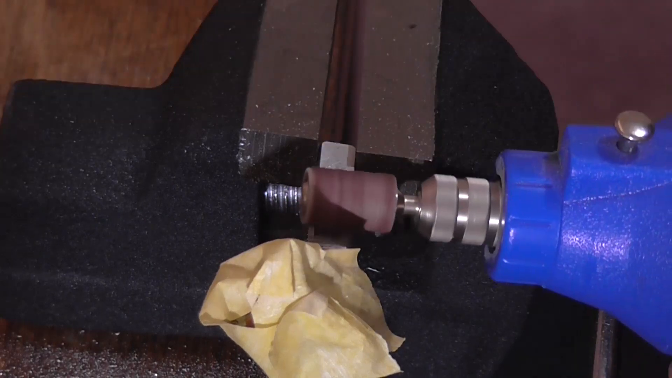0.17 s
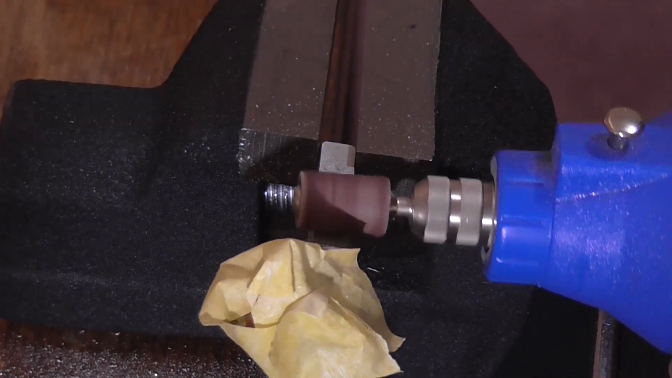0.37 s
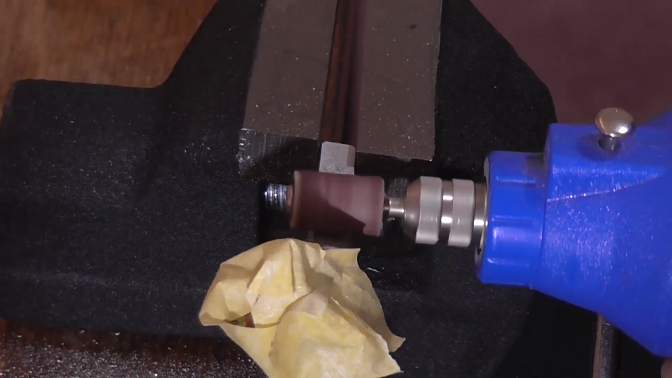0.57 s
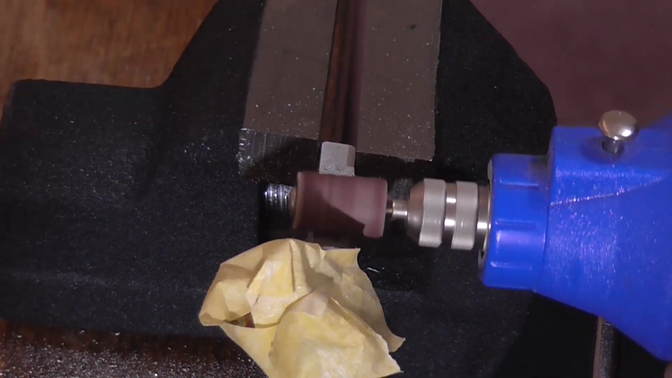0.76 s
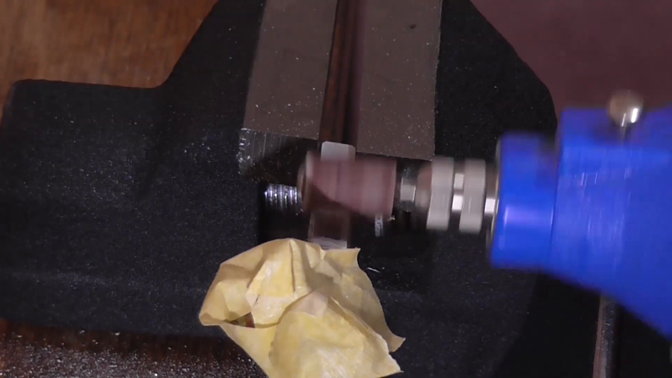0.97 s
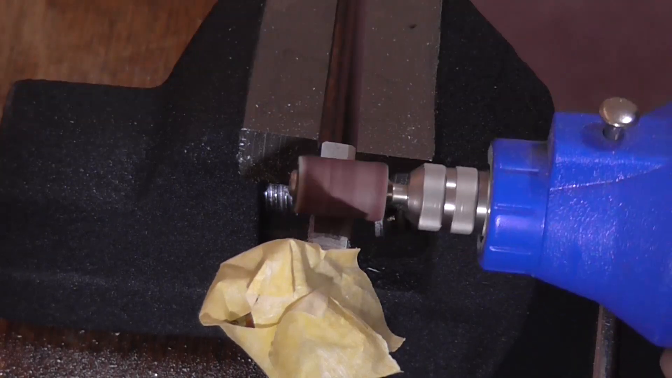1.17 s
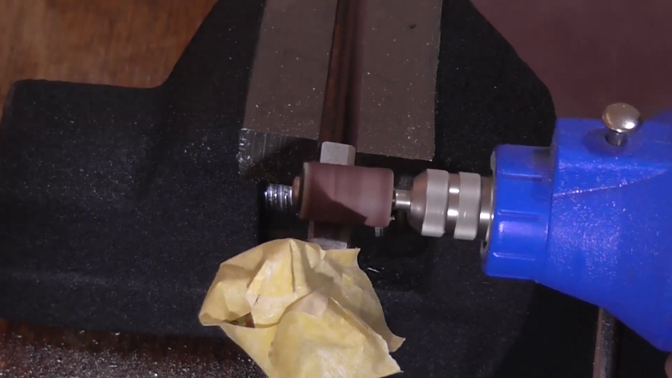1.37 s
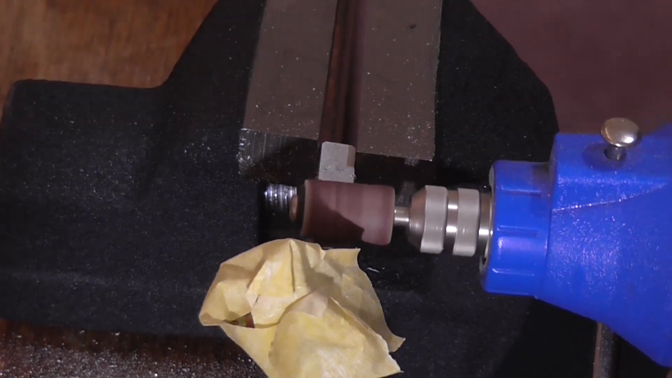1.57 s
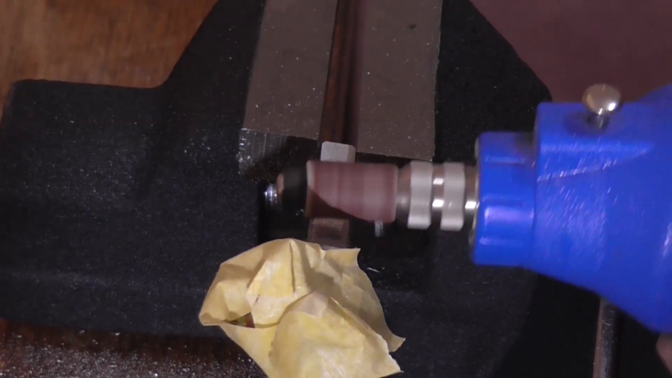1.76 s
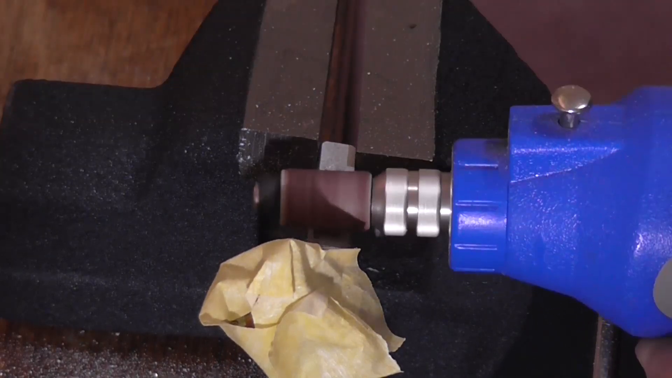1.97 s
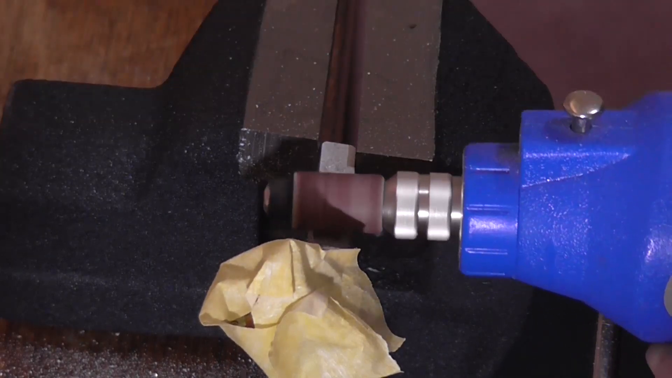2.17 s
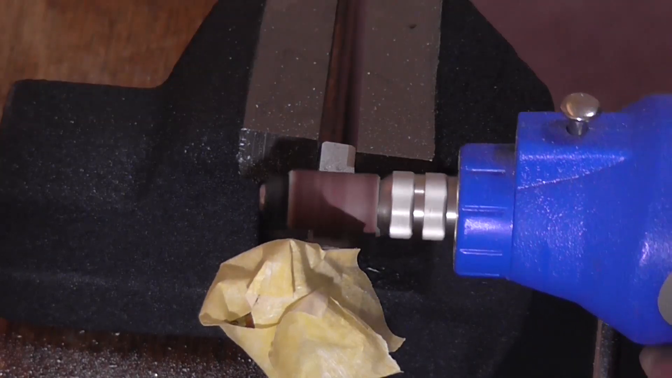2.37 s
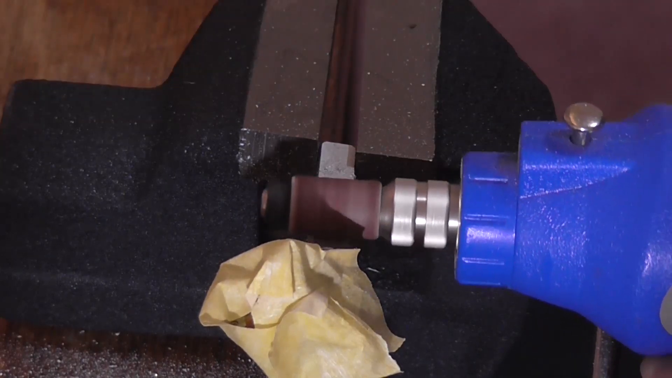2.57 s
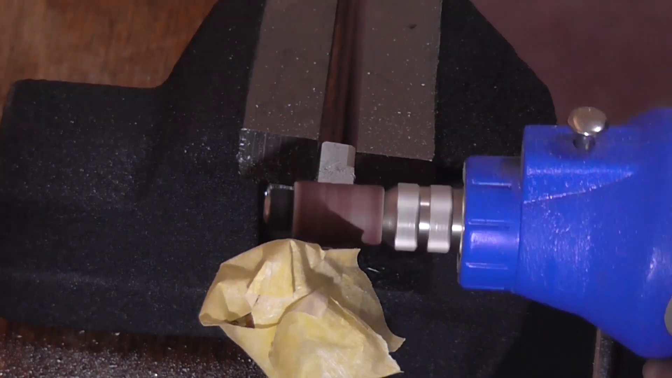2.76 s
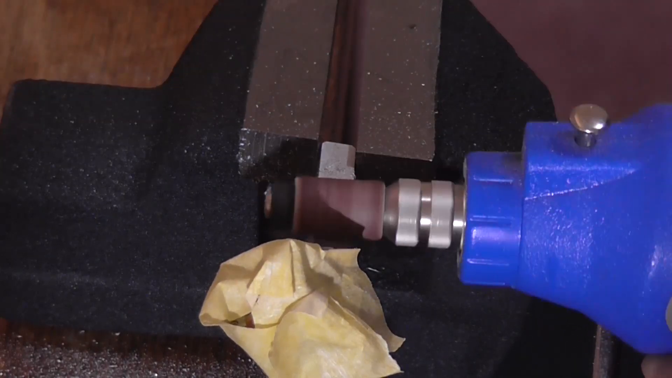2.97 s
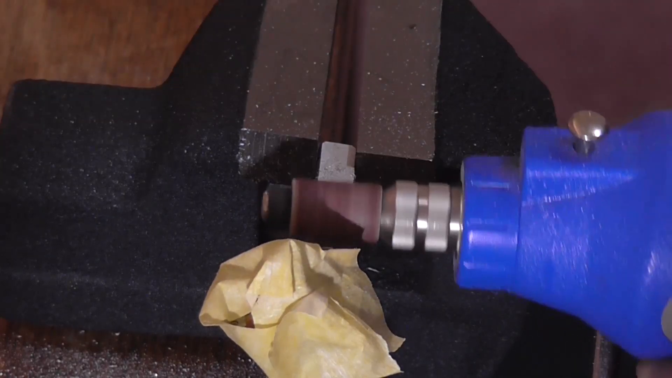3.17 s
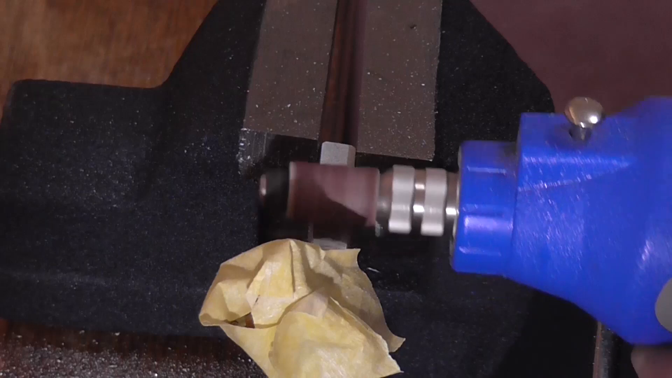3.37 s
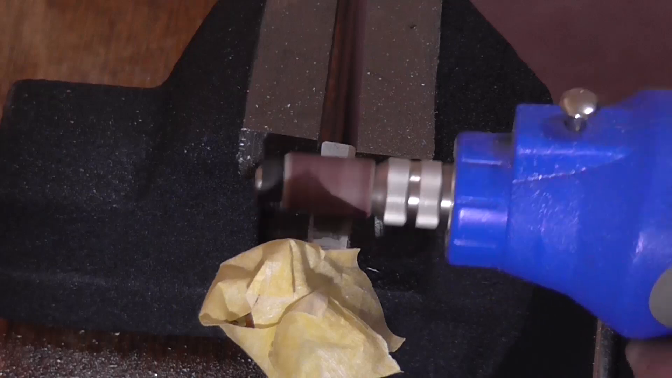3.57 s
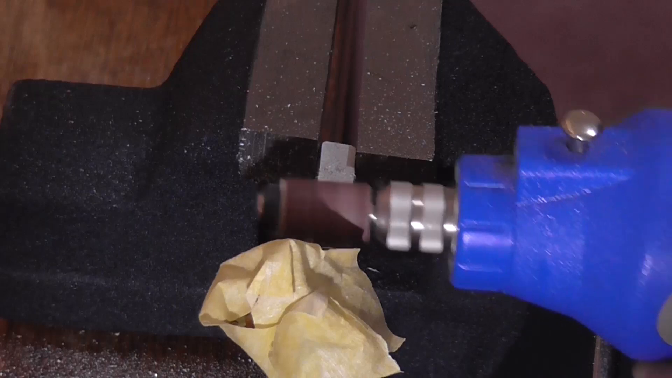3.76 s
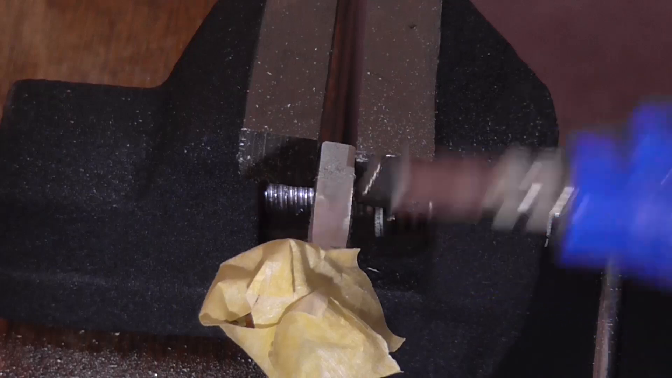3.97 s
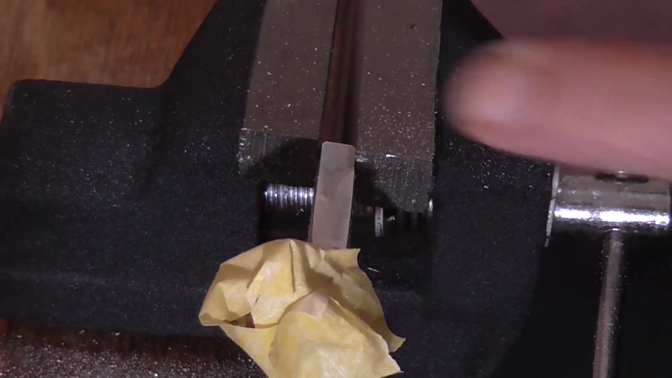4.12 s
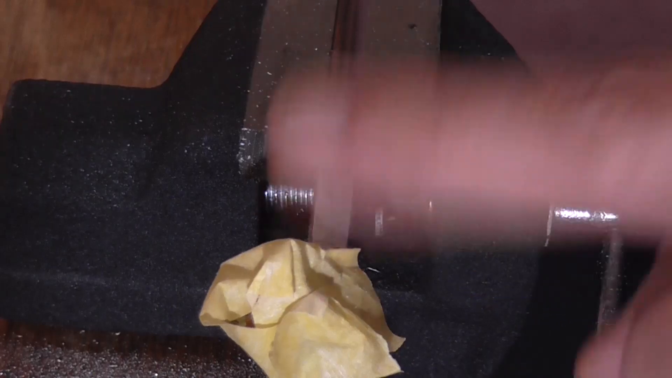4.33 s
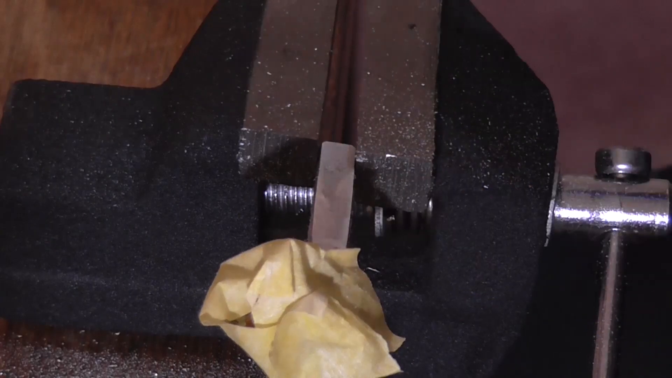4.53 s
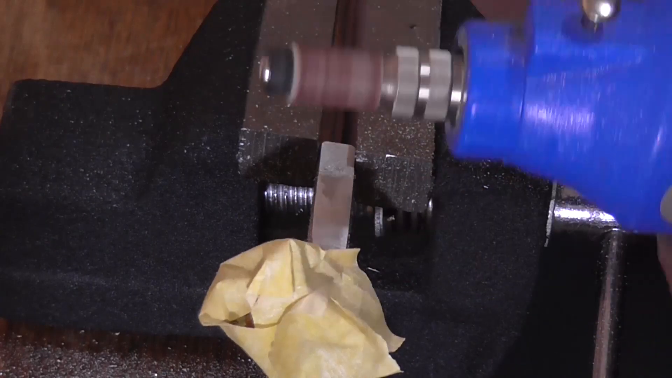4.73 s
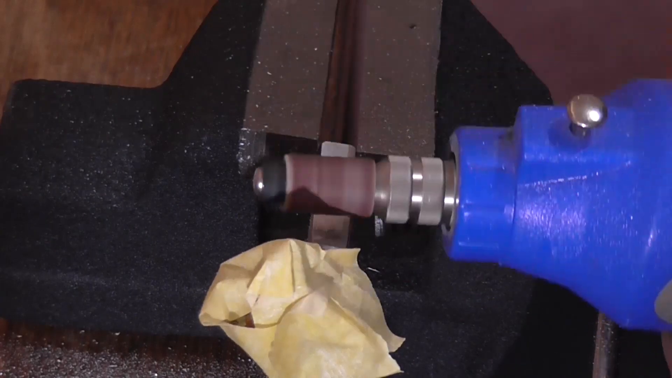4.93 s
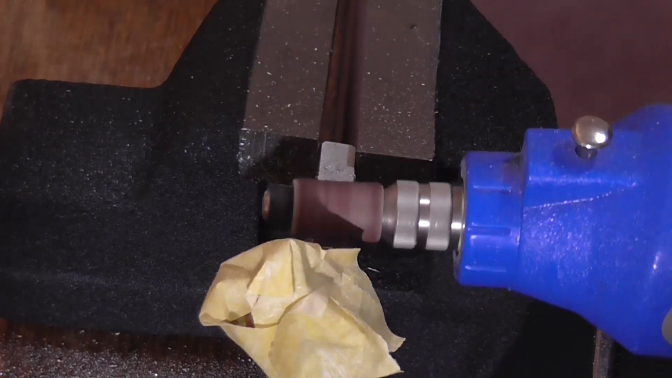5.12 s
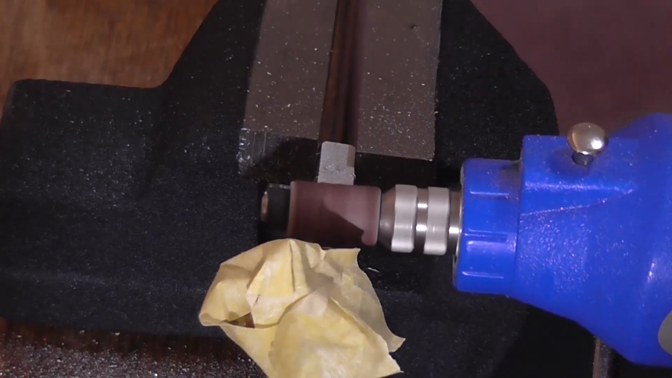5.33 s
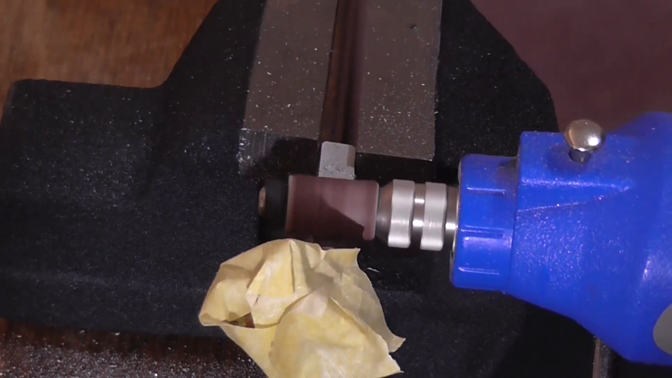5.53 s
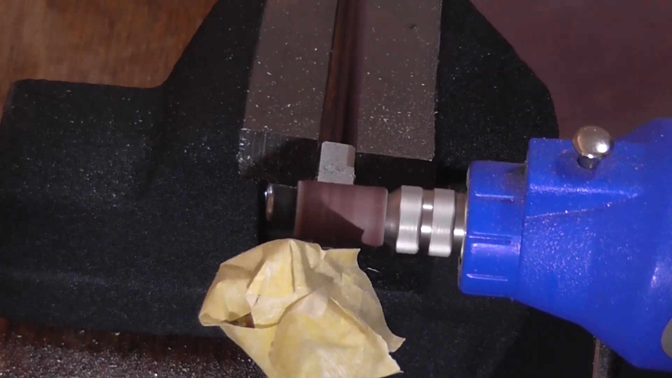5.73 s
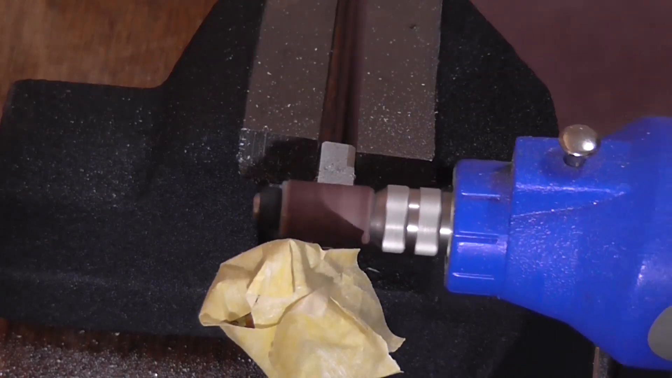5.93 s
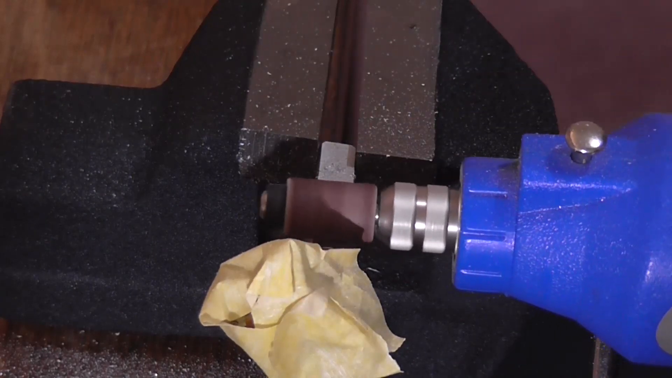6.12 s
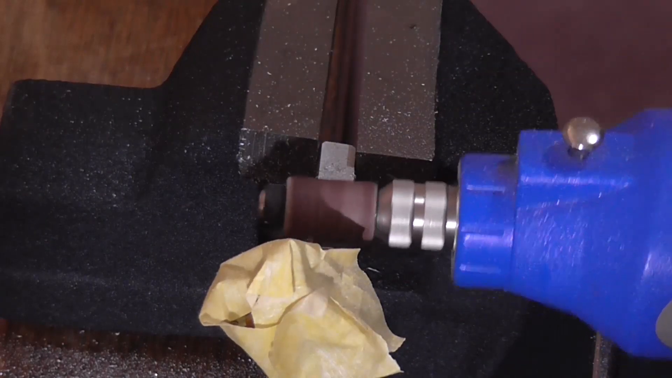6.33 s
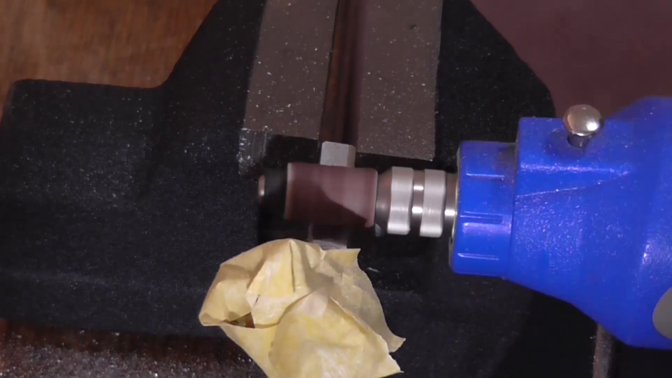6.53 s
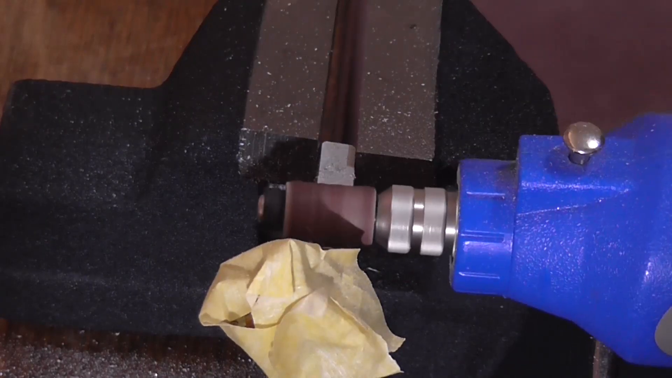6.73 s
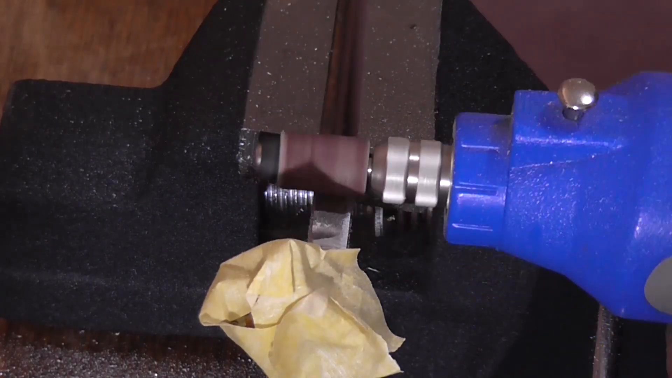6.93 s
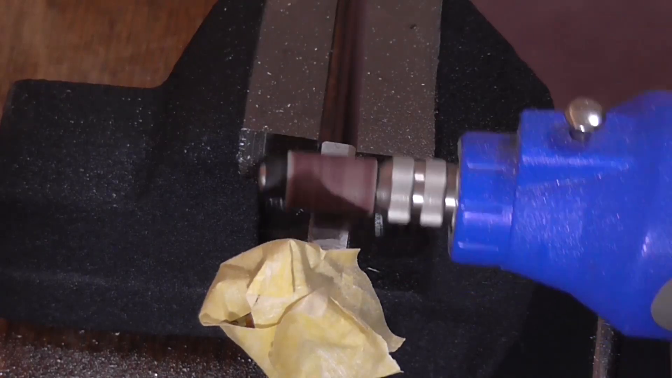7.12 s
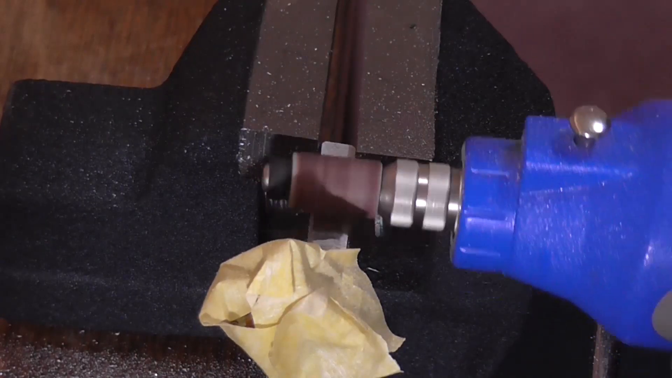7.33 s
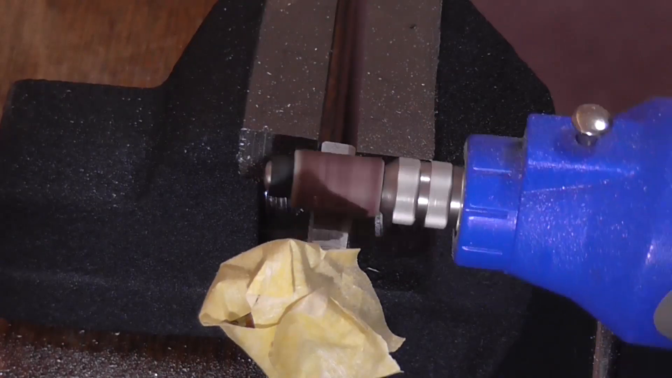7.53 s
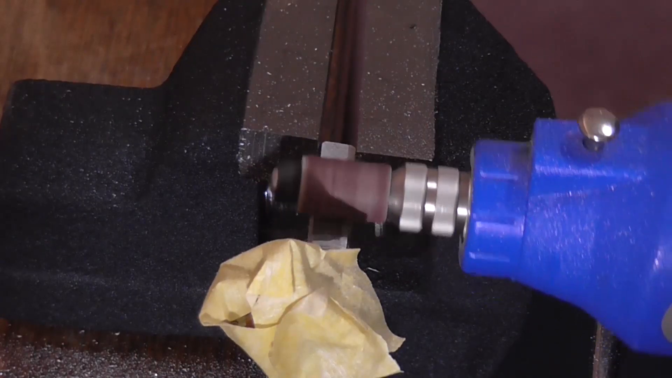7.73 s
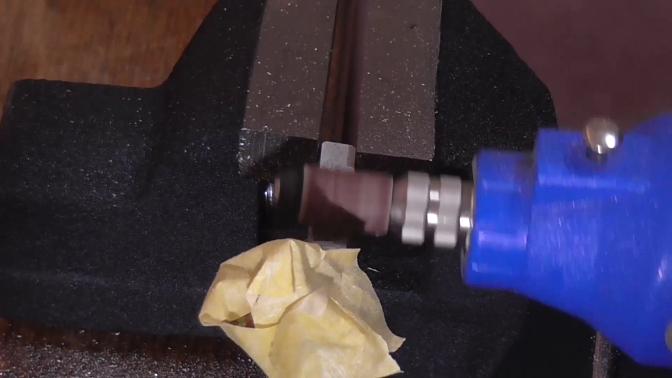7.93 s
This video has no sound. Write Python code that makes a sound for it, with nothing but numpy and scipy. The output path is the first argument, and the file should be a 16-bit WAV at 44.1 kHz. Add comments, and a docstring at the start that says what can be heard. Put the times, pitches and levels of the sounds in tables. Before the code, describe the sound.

A handheld rotary tool whines at a high pitch throughout, heard close up in a quiet room. Almost at once its sanding drum bites into a small steel shaft held in a vise, making a buzzing rasp and a bright gritty hiss over a faint hum from the vise. The motor's pitch sags and wavers with the hand's pressure. The grinding breaks off briefly at about 1.1 and 1.9 seconds, and a sharp little click comes near 3 seconds. From 4 to 5.3 seconds the tool runs free with a higher, steadier whine, short bursts of bearing chatter and a soft double bump on the bench around 4.5 seconds. Grinding resumes with a harsh scrape at 5.3 seconds, lifts for a moment at 6.5, then continues until 8 seconds with a few tiny ringing squeals and another click.

```python
"""A handheld rotary tool grinds the end of a small steel shaft held in a vise.
Running free, its motor and fan whine on the multiples of its speed. In six passes the sanding drum
is pressed on: the motor slows, and once a turn the drum's high side drags its grit over the steel.
The shaft rasps, the grains hiss, the vise thrums and its jaws growl. In the longest pause the tool
swings aside, its bearings chatter and the bench takes two soft bumps, all in a quiet room."""
import sys
import numpy as np
from scipy import signal
from scipy.fft import rfft, irfft, next_fast_len
from scipy.io import wavfile
from scipy.ndimage import uniform_filter1d, map_coordinates

SR = 44100
rng = np.random.default_rng(int(sys.argv[2]) if len(sys.argv) > 2 else 0)


def unload_audio(sound):
    """Save the sound as a 16-bit wav file, at the path given as the first command line argument."""
    columns = np.transpose(np.atleast_2d(sound))
    # keep every value between -1 and 1, then stretch to whole-number steps
    steps = np.round(np.clip(columns, -1, 1) * 32767)
    wavfile.write(sys.argv[1], SR, steps.astype(np.int16))


N = 352359

# Resonances of vise and bench. Each row: frequency in Hz, width in Hz, relative level in dB.
VISE_MODES = [(421.2, 10.1, 8.5), (500.5, 6, 11)]
# Resonances of shaft, drum and housing. Each row: frequency in Hz, width in Hz, relative level in dB.
SHAFT_MODES = [(1357, 220, -8.5), (1500, 22, 1.5), (1692, 140, -3), (1956, 56, -3), (2128, 93, 1),
               (2307, 53, 6), (2514, 233, -3), (2676, 39, 6.5), (2845, 100, 1.5), (3139, 52, 4.5),
               (3486, 390, -2.5), (4055, 380, 4), (4193, 230, 6), (4543, 85, 2), (4880, 1500, -11.5)]
# Dust thrown off the drum. Each row: frequency in Hz, relative level in dB.
DUST_SPECTRUM = [(1500, -36), (4800, 4), (12000, 0), (16000, -18)]
# Grains cutting the steel. Each row: frequency in Hz, relative level in dB.
HISS_SPECTRUM = [(400, -106), (3500, -2.5), (5600, -17.5), (6300, -4), (7680, 0.5), (8150, -3), (8500, 4),
                 (9000, -7), (9700, 0.5), (10200, -7), (13200, -4.5), (14100, -11), (16000, -11)]
# The spindle chatters in its bearings. Each row: centre in seconds, width in seconds, level in dB.
CHATTER_BURSTS = [(4.113, 0.04, -41), (4.371, 0.0086, -39), (4.749, 0.07, -49)]
# The drum lands on the shaft. Each row: time in seconds, knock level in dB, scrape level in dB.
DRUM_LANDINGS = [(0.153, -40, -30), (1.279, -41, -28.5), (2.002, -48, -39), (5.277, -42, -27.5),
                 (6.612, -41.5, -39)]


def amp(db):
    """Decibels as a gain."""
    return 10 ** (np.asarray(db) / 20)


def unit(x):
    """x at rms 1."""
    return x / np.sqrt(np.mean(x ** 2) + 1e-20)


def steady(x):
    """x with its slow swells taken out, at rms 1."""
    return x / np.sqrt(np.abs(uniform_filter1d(x * x, size=3000)) + 1e-9)


def clock():
    """The time of each sample in seconds."""
    return np.arange(N) / SR


def curves(rows):
    """One value per sample for each column after the time."""
    times, *columns = np.transpose(rows)
    return [np.interp(clock(), times, column) for column in columns]


def wobble(rate):
    """A smooth random curve, rate knots a second."""
    coarse = np.arange(0, N + 32, 32)
    knots = rng.standard_normal(int(N * rate / SR) + 4)
    return np.interp(np.arange(N), coarse, map_coordinates(knots, [coarse * rate / SR], mode="nearest"))


def swell(centre, width, db=0):
    """A bell-shaped gain; centre and width in seconds."""
    return amp(db) * np.exp(-.5 * ((clock() - centre) / width) ** 2)


def dying(blows, t60):
    """Envelope of (seconds, dB) blows that start softly and fade."""
    t = clock()
    return sum(amp(db - 60 * np.abs(t - s) / t60) * np.clip((t - s) / 0.0056 + .5, 0, 1)
               for s, db in blows)


def ringing_on(gain, decay_s=0.02):
    """A gain that rises at once and falls no faster than the steel rings out."""
    keep = np.exp(-1 / (decay_s * SR))
    return np.maximum(gain, signal.lfilter([1 - keep], [1, -keep], gain))


def filtered(x, response):
    """x through a complex response of frequency."""
    size = next_fast_len(N + SR // 4)
    return irfft(rfft(x, size) * response(np.fft.rfftfreq(size, 1 / SR)), size)[..., :N]


def coloured(x, points):
    """x shaped by (Hz, dB) points, at rms 1."""
    hz, db = np.transpose(points)
    return unit(filtered(x, lambda f: amp(np.interp(np.log(f + 1), np.log(hz), db))))


def rung(x, modes):
    """x through (Hz, width, dB) resonances, falling steeply outside their range, at rms 1."""
    low, high = .8 * modes[0][0], 1.25 * modes[-1][0]

    def response(f):
        peaks = sum((-1) ** k * amp(db) * 1j * f * width / (hz * hz - f * f + 1j * f * width)
                    for k, (hz, width, db) in enumerate(modes))
        return peaks * f ** 6 / (f ** 6 + low ** 6) / (1 + (f / high) ** 6)
    return unit(filtered(x, response))


def diffused(x, t60):
    """x smeared by a short, dense tail of decaying noise."""
    t = np.arange(SR // 8) / SR
    tail = rng.standard_normal(len(t)) * amp(-60 * t / t60)
    return signal.fftconvolve(x, tail / np.linalg.norm(tail))[:N]


def spread(x, side_db, t60):
    """Reflections off the bench differ left and right and widen the sound."""
    side = amp(side_db) * filtered(diffused(x, t60), lambda f: 1 / np.sqrt(1 + (f / 8000) ** 4))
    return np.array([x + side, x - side])


def off_axis(x, pan_db, lag_s):
    """The sound arrives louder on the right, but later than on the left."""
    sides = np.array([[-.5], [.5]])
    return filtered(x, lambda f: amp(pan_db * sides) * np.exp(-2j * np.pi * f * lag_s * sides))


def background(load):
    """Quiet room air and a rumble of the bench that grows with the load."""
    # Room tone and bench rumble. Each row: frequency in Hz, relative level in dB.
    room_spectrum = [(25, -18), (70, -14), (110, 1.5), (150, -7), (200, -1), (500, 6.5), (2000, -26)]
    bench_spectrum = [(30, -27), (110, -10), (150, -22), (195, 8.5), (260, -3.5), (330, 13.5), (600, -36)]
    noise = lambda: rng.standard_normal((2, N)) + rng.standard_normal(N)  # partly shared by both sides
    room = amp(-69.5) * coloured(noise(), room_spectrum)
    return room + amp(-50.5) * load * coloured(noise(), bench_spectrum)


def knocks(knock_t60, bump_ring_db):
    """The vise rings when the drum lands on the shaft; bumps on the bench thud and barely stir it."""
    # Soft bumps on the bench. Each row: time in seconds, level in dB.
    bumps = [(4.447, -47), (4.469, -50)]
    t, ring_hz = clock(), VISE_MODES[1][0]
    ring = sum(dying([(s, db)], knock_t60) * np.sqrt(2) * np.sin(2 * np.pi * ring_hz * (t - s))
               for s, db, _ in DRUM_LANDINGS)
    thud = coloured(rng.standard_normal(N), [(110, -27), (450, -2), (900, -15), (2500, -45)])
    stirred = amp(bump_ring_db) * steady(rung(rng.standard_normal(N), VISE_MODES))
    return ring + dying(bumps, t60=0.12) * thud + dying(bumps, t60=0.45) * stirred


def tremor(rate_hz, depth):
    """The hand's uneven trembling, as a factor on its force."""
    phase = rate_hz * clock() + .3 * wobble(7) + rng.random()
    return 1 + depth * np.sin(2 * np.pi * phase)


def hand():
    """The hand's drag on the spindle in Hz, and the gains of rasp, hiss, thrum and growl it drives."""
    # The drum is held to the steel. Each row: start and end in seconds, then base levels in dB
    # of rasp, hiss, thrum at the start, thrum at the end and growl.
    passes = [(0.154, 1.05, -28.5, -27.5, -37, -38.5, -39.5), (1.276, 1.824, -29.5, -30, -38.5, -42, -40),
              (2.005, 2.988, -28.5, -29, -42, -40, -38.5), (3.004, 4.038, -29, -30, -39.5, -44.5, -40.5),
              (5.277, 6.434, -30.5, -31, -40.5, -53, -42.5), (6.613, 7.996, -29.5, -28.5, -53, -41.5, -44)]
    # How hard the hand leans, one curve a pass. Each point: time in seconds, speed lost in Hz.
    leans = [
        [(0.155, 3.7), (0.245, 7.8), (0.27, 24), (0.31, 9), (0.445, 11), (0.475, 22.5), (0.685, 20.3),
         (0.79, 35.2), (0.88, 38), (0.95, 31.5), (0.995, 40), (1.01, 16), (1.055, 27.3)],
        [(1.28, 12), (1.39, 3.76), (1.455, 34.4), (1.61, 19.2), (1.665, 29.6), (1.74, 48.6), (1.77, 32.4),
         (1.825, 40)],
        [(2.005, 11.7), (2.14, 41.3), (2.19, 27), (2.22, 44), (2.32, 31.5), (2.395, 35.3), (2.41, 65.5),
         (2.495, 40.5), (2.615, 54), (2.695, 63), (2.735, 34), (2.93, 49.3), (2.98, 10.9)],
        [(3.005, 14.8), (3.09, 52.6), (3.145, 56), (3.175, 21.6), (3.255, 64), (3.37, 33.0), (3.4, 58.7),
         (3.54, 34), (3.575, 68), (3.6, 47), (3.69, 45), (3.83, 57), (3.88, 34.5), (3.915, 82.5), (3.995, 54),
         (4.015, 25)],
        [(5.28, 8.5), (5.42, 15.2), (5.46, 38.7), (5.62, 53), (5.67, 46.3), (5.74, 70), (5.765, 48.4),
         (5.855, 62.4), (5.89, 58.5), (6.02, 63.4), (6.44, 52.5)],
        [(6.615, 19.8), (6.735, 21.2), (6.87, 51), (7.09, 33.4), (7.165, 79), (7.19, 50.6), (7.255, 38.3),
         (7.36, 69), (7.46, 47), (7.52, 58), (7.535, 70), (7.655, 44), (7.72, 73), (7.825, 45), (7.86, 80),
         (7.965, 43)],
    ]
    # The grit catches (+) or skates (-). Each row: centre and width in seconds, rasp and hiss in dB.
    catches = [(0.27, 0.016, 4.5, 1.5), (0.354, 0.048, -4.5, -3), (0.707, 0.038, 2, 3),
               (0.947, 0.018, 1, 1.5), (1.627, 0.013, 4.5, 3.5), (2.988, 0.021, -5, 0),
               (3.178, 0.016, -5, -3.5), (3.238, 0.016, 2, -1), (4.026, 0.016, -3.5, 0),
               (5.307, 0.0092, -8, -7), (6.779, 0.03, -4.5, -5), (6.889, 0.018, -8, -10),
               (7.151, 0.029, -1.5, -2)]
    inertia_s, clog_db_per_s, usual_drag_hz = 0.0088, -4, 40
    bite_s, lift_s = 0.00933, .022
    t, drag, gains = clock(), np.zeros(N), np.zeros((4, N))
    trembling = tremor(rate_hz=11.5, depth=.13)
    catch_rasp = sum(db * swell(s, width) for s, width, db, _ in catches)
    catch_hiss = sum(db * swell(s, width) for s, width, _, db in catches)
    for (start, end, rasp_db, hiss_db, *thrum_db, growl_db), lean in zip(passes, leans):
        contact = np.interp(t, [start - bite_s, start, end, end + lift_s], [0, 1, 1, 0])
        on = contact > 0
        s = t[on]
        ahead = s + inertia_s  # the force leads the drop in speed
        force = np.interp(ahead, *np.transpose(lean)) * np.interp(ahead, t, trembling)
        shove_db = -0.0359 * (force - uniform_filter1d(force, size=12000))  # softens sudden shoves
        # More force, louder grinding: the slopes are in dB per Hz of drag.
        rasp = rasp_db + 0.0654 * force + shove_db + catch_rasp[on]
        hiss = hiss_db + 0.133 * force + clog_db_per_s * (s - start) + catch_hiss[on]
        thrum = np.interp(s, [start, end], thrum_db) + 0.1023 * (force - usual_drag_hz)
        growl = growl_db + 0.1392 * (force - usual_drag_hz) + shove_db
        drag[on] += contact[on] * np.interp(s, *np.transpose(lean)) * trembling[on]
        gains[:, on] += contact[on] * amp([rasp, hiss, thrum, growl])
    return drag, gains


def rotation(speed, load, flutter, judder):
    """Turns made by the spindle, whose speed trembles, more so under load."""
    return np.cumsum(speed * (1 + flutter * wobble(130) + judder * load * wobble(120))) / SR


def high_side(turns, sharp, base):
    """Contact force: a peak once a turn over a steady share."""
    return base + np.exp(sharp * (np.cos(2 * np.pi * turns) - 1))


def grit(turns, wear_rate, loose, grains=96):
    """The same grains come round each turn and slowly change; loose chips add fresh noise."""
    surface = rng.standard_normal((int(N / SR * wear_rate) + 3, grains))
    track = map_coordinates(surface, [clock() * wear_rate, turns % 1 * grains], order=2, mode="grid-wrap")
    return unit(track) + loose * rng.standard_normal(N)


def shaking(turns, load, thrum_gain, growl_gain):
    """The drum's push makes the vise thrum at the speed and its jaws growl an octave above."""
    # Resonances of the jaws. Each row: frequency in Hz, width in Hz, relative level in dB.
    jaw_modes = [(671.3, 11.3, 19), (798, 29, 12.5), (838.5, 44, 18.5)]
    skips = load * (2 * wobble(90) + 3 * wobble(700))  # under load the drum hops and pushes unevenly
    push = high_side(turns, sharp=0.4, base=0) * (1 + 0.39 * wobble(60) + skips)
    waver = amp(0.72 * wobble(30))
    jolts = (0.19 + 1.5 * load) * rng.standard_normal(N)
    thrum = waver * steady(rung(push + jolts, VISE_MODES))
    flicker = amp(3.16 * wobble(45) + 3.55 * wobble(160))
    octave = flicker * np.tanh(load / 0.017) * np.sqrt(2) * np.sin(2 * np.pi * 2 * turns)
    rattle = (.08 + 4 * load) * rung(rng.standard_normal(N), jaw_modes)
    growl = amp(1.6 * wobble(22)) * unit(octave + rattle)
    return ringing_on(thrum_gain) * thrum + ringing_on(growl_gain) * growl


def draught(turns):
    """Cooling air chopped by the fan."""
    # The fan's draught. Each row: frequency in Hz, relative level in dB.
    air_spectrum = [(100, -52), (700, 2.5), (4200, 2), (5100, -11), (6000, 0.5), (6800, 1.5), (12000, 5.5),
                    (16000, -26)]
    chopped = amp(2 * wobble(14)) * grit(turns, wear_rate=30, loose=0.62)
    return amp(-47.5) * coloured(chopped, air_spectrum)


def bearing_chatter(turns):
    """The spindle rattles in its bearings in short bursts that ring the housing."""
    bursts = sum(swell(*row) for row in CHATTER_BURSTS)
    rattle = grit(turns, wear_rate=67, loose=0.8)
    return bursts * (amp(3.0) * rung(rattle, SHAFT_MODES) + amp(-14.0) * coloured(rattle, DUST_SPECTRUM))


def motor(turns, load):
    """Fan and commutator partials, each wavering on its own; load damps the high ones most."""
    # The strongest partials beam in different directions.
    # Each row: multiple of the speed, level in dB facing the vise, level in dB swung aside.
    loud_partials = [(4, -47, -51.5), (6, -45, -48), (7, -49.5, -39), (15, -46.5, -48.5), (25, -40, -48.5),
                     (26, -42, -58), (30, -43, -57)]
    # Weaker motor and fan partials. Each row: multiple of the speed, relative level in dB.
    weak_partials = [(1, -26.5), (2, -16.5), (3, -19.5), (8, -13), (10, -17.5), (11, -22.5), (12, -22),
                     (14, -17.5), (16, -18), (17, -13.5), (20, -16), (22, -17), (23, -14), (28, -15),
                     (29, -10.5), (33, -23), (34, -14.5)]
    # How the tool is held. Each row: time in seconds, swing aside from 0 to 1, gain in dB of the
    # loud and weak partials, level in dB of the lower whine, level in dB of the upper whine.
    poses = [(0.06, 0.08, 1, -40.5, -46.5), (1.2, 0, 0, -43.5, -42), (1.92, 0.04, -0.5, -46, -42.5),
             (4.05, 0.04, -2, -39, -41), (4.17, 0.95, 0.5, -46.5, -52), (4.58, 0.98, 0, -45, -47),
             (4.7, 0.21, 0, -38.5, -39.5), (4.83, 0, 0, -39, -34.5), (4.9, 0.25, -0.5, -38.5, -41.5),
             (5.0, 0.05, -1.5, -39, -55), (5.06, 0.11, -0.5, -38.5, -38), (5.25, 0.03, -0.5, -38, -35.5),
             (6.53, 0.03, -5, -40, -56)]
    whine_multiples, beat_hz = (5, 9), 15.4
    aside, level_db, *whines_db = curves(poses)
    pressed = np.tanh(load / 0.049)
    beat = beat_hz * clock() + 0.15 * wobble(4)
    jostle = sum(swell(s, width) for s, width, _ in CHATTER_BURSTS)

    def partial(k, beat_db=0):
        gain_db = 0.2174 * k * aside * wobble(11.0)  # short waves flutter as the tool swings
        gain_db += 2.4 * np.tanh(k / 20) * wobble(7)  # the high partials fade and swell
        gain_db += 4.5 * jostle * (wobble(55) - .5)  # bearing chatter shakes them all
        if beat_db:
            gain_db += beat_db * np.sin(2 * np.pi * (beat + rng.random()))
        gain_db += 1.9 * wobble(150)  # fast roughness
        gain_db -= pressed * (8.5 + 0.61 * k)
        return np.sqrt(2) * amp(gain_db) * np.sin(2 * np.pi * (k * turns + rng.random()))
    strong = sum(amp(db + aside * (aside_db - db)) * partial(k) for k, db, aside_db in loud_partials)
    buzz = sum(amp(db - 0.1132 * k * aside) * partial(k) for k, db in weak_partials)
    buzz /= np.linalg.norm([amp(db) for _, db in weak_partials])
    whines = sum(amp(db) * partial(k, beat_db=2) for k, db in zip(whine_multiples, whines_db))
    return whines + amp(level_db) * (strong + amp(-43) * buzz)


def ticks(width_s):
    """Single grains break off the drum with a click."""
    # Breaking grains. Each row: time in seconds, level in dB.
    breaks = [(2.971, -23), (3.322, -31), (7.545, -30)]
    noise = rng.standard_normal(N)
    click = unit(coloured(noise, HISS_SPECTRUM) + rung(noise, SHAFT_MODES))
    return sum(swell(s, width_s, db) for s, db in breaks) * click


def ringing_squeals(turns):
    """Short ringing squeals as an overtone passes a resonance of the shaft or jaws."""
    # Each row: centre in seconds, width in seconds, multiple of the speed, level in dB.
    squeals = [(0.701, 0.011, 8, -28), (1.374, 0.021, 6, -30.5), (6.659, 0.026, 9, -33),
               (6.686, 0.044, 10, -37), (6.685, 0.026, 2, -44), (6.963, 0.014, 7, -31.5),
               (7.496, 0.02, 9, -29.5)]
    return sum(swell(s, width, db) * np.sqrt(2) * np.sin(2 * np.pi * k * turns)
               for s, width, k, db in squeals)


def first_bites(t60):
    """A short, harsh scrape as the grit first hits the steel."""
    noise = rng.standard_normal(N)
    scrape = unit(rung(noise, SHAFT_MODES) + amp(2.0) * coloured(noise, HISS_SPECTRUM))
    return dying([(s, db) for s, _, db in DRUM_LANDINGS], t60) * scrape


def through_steel(x, power_share=.22):
    """Fine, close modes catch each gliding overtone in turn and break it into patches."""
    return np.sqrt(1 - power_share) * x + np.sqrt(power_share) * diffused(x, t60=.05)


def frayed(x, above_hz):
    """The highest overtones dissolve into noise that no longer repeats from turn to turn."""
    kept = lambda f: 1 / (1 + (f / above_hz) ** 14)
    overtones = filtered(unit(x), lambda f: np.sqrt(kept(f)))
    return overtones + filtered(rng.standard_normal(N), lambda f: np.sqrt(1 - kept(f)))


def grinding(turns, load, rasp_gain, hiss_gain):
    """Each turn the drum scrapes the shaft; a light touch buzzes, a heavy one tears and throws dust."""
    # The shaft's short end squeals under load. Each row: frequency in Hz, width in Hz, base level in dB.
    squeal_modes = [(3467, 90, -14.5)]
    chips_per_s, squeal_db = 600, squeal_modes[0][2]
    bounce = wobble(45)
    hops = amp(0.7 * wobble(260))  # no two turns scrape equally hard
    tears = (rng.random(N) < chips_per_s / SR) * rng.uniform(-1.05, 1, N)
    chips = amp(-7) * np.tanh(10 * load) ** 2 * unit(tears)
    rubbing = steady(through_steel(grit(turns, wear_rate=38, loose=.15 + 4 * load)))
    scrape = hops * (rubbing + chips) * high_side(turns, sharp=5.3, base=0.58)
    squeal = amp(squeal_db + 0.8 * wobble(25)) * (load / 0.13) * rung(scrape, squeal_modes)
    rasp = amp(-5.0 + 0.16 * bounce) * (steady(rung(scrape, SHAFT_MODES)) + squeal)
    grains = frayed(through_steel(grit(turns, wear_rate=26, loose=0.3 + 3 * load)), above_hz=10300)
    cutting = (grains + .7 * chips) * high_side(turns, sharp=1.5, base=2)
    hiss = amp(-4.0 + 0.07 * bounce + 1.1 * wobble(60)) * steady(coloured(cutting, HISS_SPECTRUM))
    puffs = amp(-13.0 + 3.0 * wobble(80)) * np.sqrt(load / 0.24)
    dust = puffs * coloured(rng.standard_normal(N), DUST_SPECTRUM)
    return ringing_on(rasp_gain) * rasp + ringing_on(hiss_gain) * (hiss + dust)


def scene():
    """The hand's drag slows the spindle and drives the grinding; tool and bench sit in a quiet room."""
    # Spindle speed with no load. Each row: time in seconds, turns a second.
    free_speed = [(0, 449.6), (1.1, 452), (6.3, 451.7), (6.52, 456), (6.75, 452)]
    drag_hz, (rasp_gain, hiss_gain, thrum_gain, growl_gain) = hand()
    free_hz, = curves(free_speed)
    load = np.clip(drag_hz / free_hz, 0, 1)  # share of the speed lost
    turns = rotation(free_hz - drag_hz, load, flutter=0.001, judder=0.04)
    tool = motor(turns, load) + draught(turns) + bearing_chatter(turns)
    tool += grinding(turns, load, rasp_gain, hiss_gain)
    tool += first_bites(t60=0.19) + ringing_squeals(turns) + ticks(width_s=0.00075)
    bench = shaking(turns, load, thrum_gain, growl_gain) + knocks(knock_t60=0.54, bump_ring_db=-17)
    wide_tool = spread(tool, side_db=-12.5, t60=.1) * amp([[-.2], [.2]])
    return wide_tool + off_axis(bench, pan_db=3.5, lag_s=.00007) + background(load)


def record(dry):
    """A steep cut removes everything above 15.8 kHz."""
    return filtered(dry, lambda hz: hz < 15800)


dry = scene()
out = record(dry)
unload_audio(out)
```